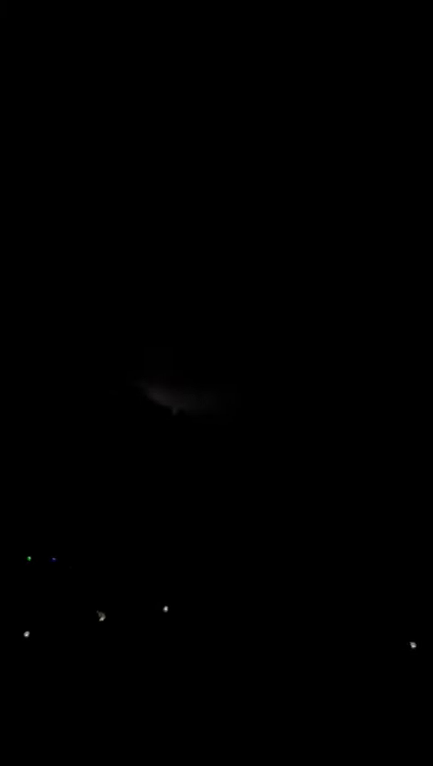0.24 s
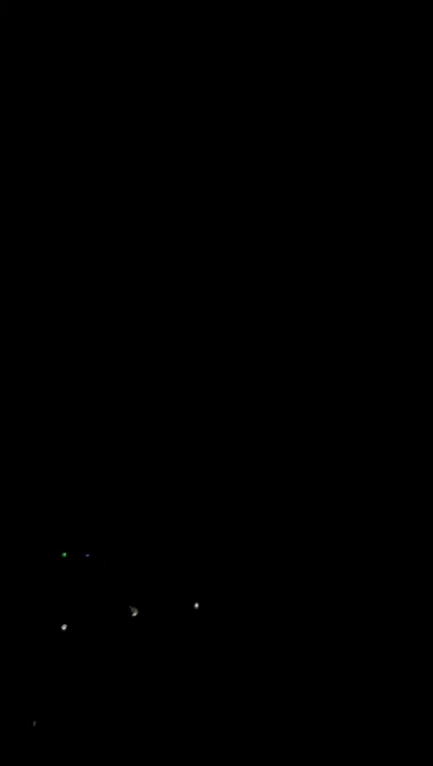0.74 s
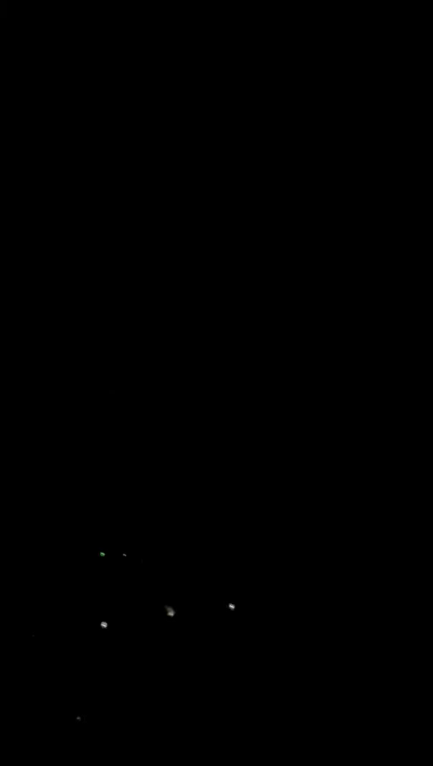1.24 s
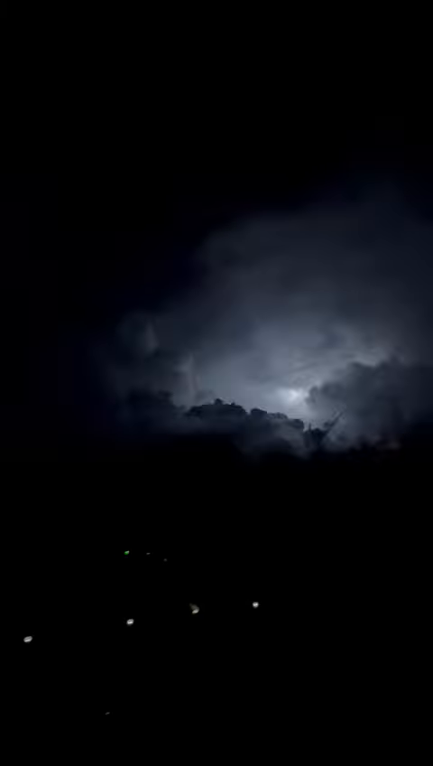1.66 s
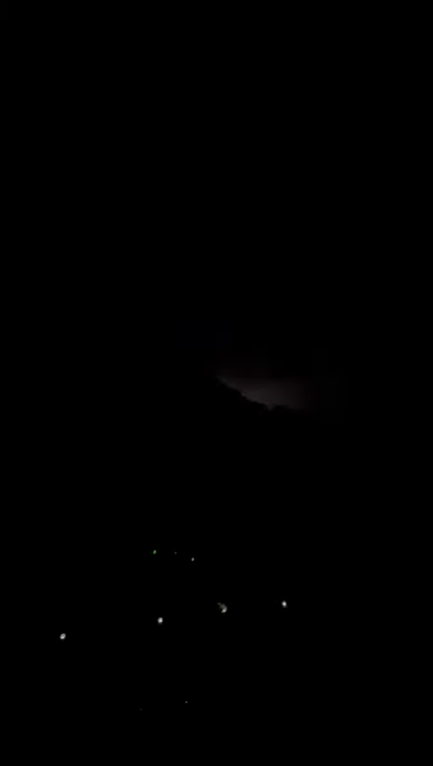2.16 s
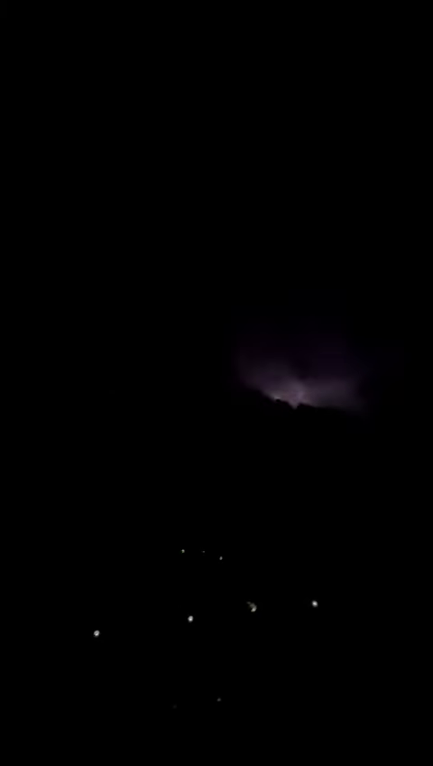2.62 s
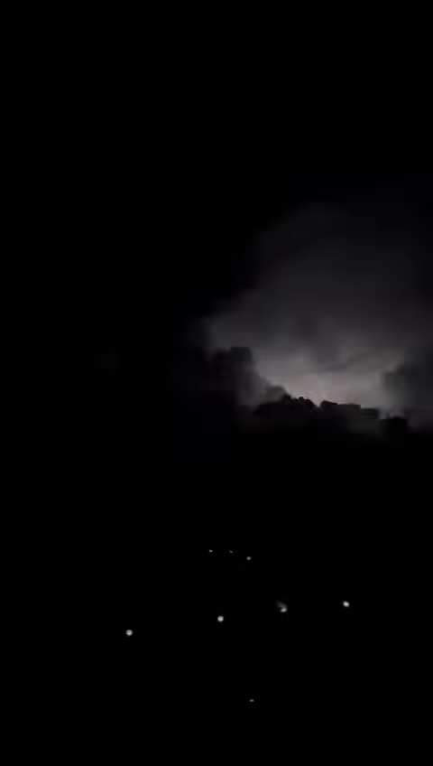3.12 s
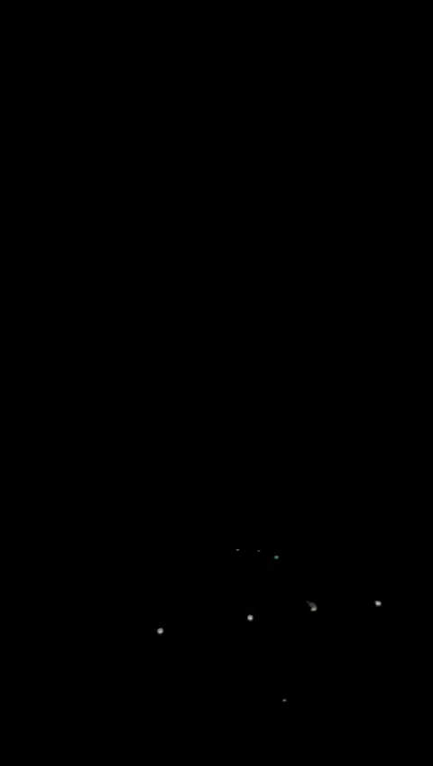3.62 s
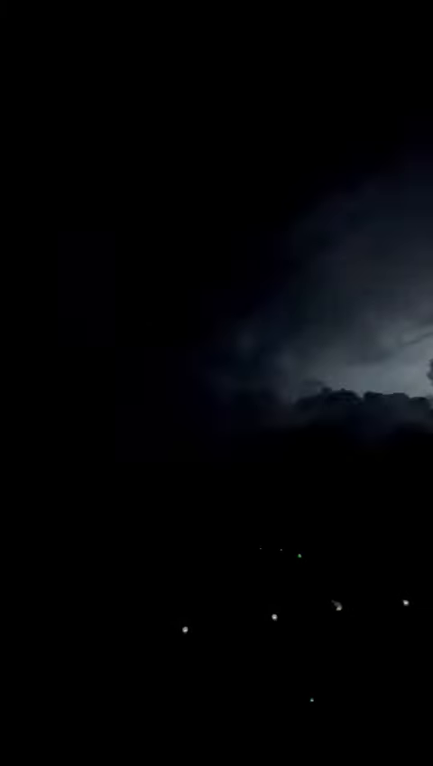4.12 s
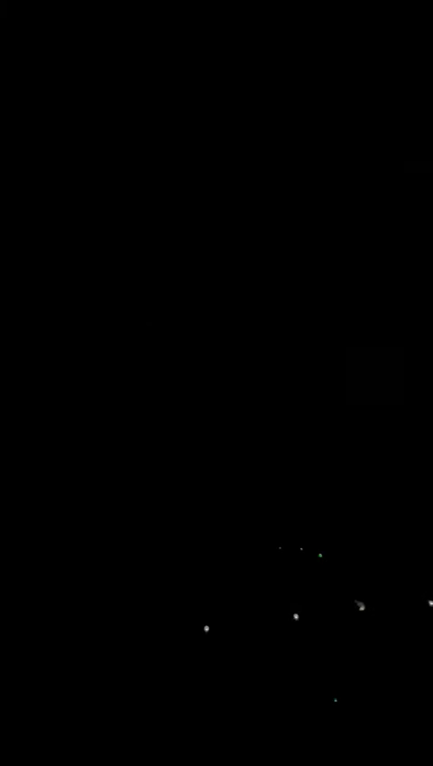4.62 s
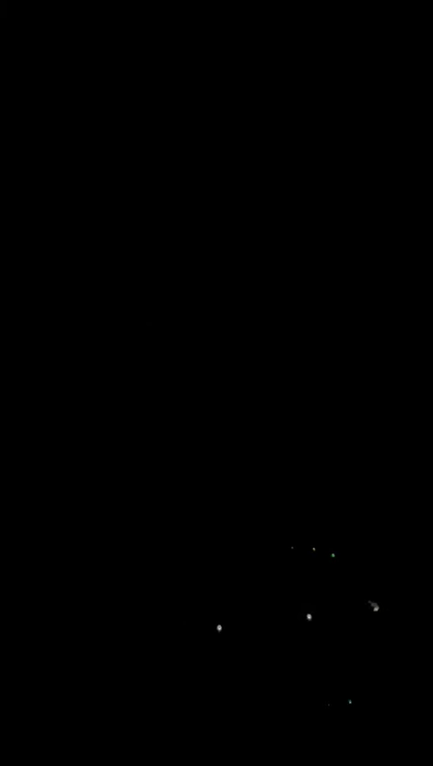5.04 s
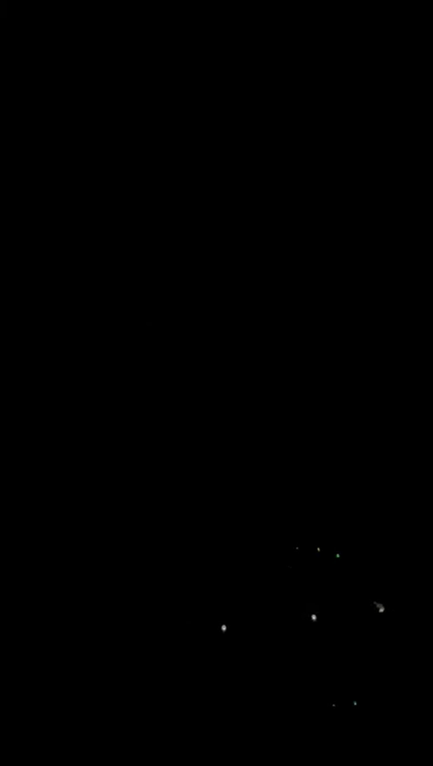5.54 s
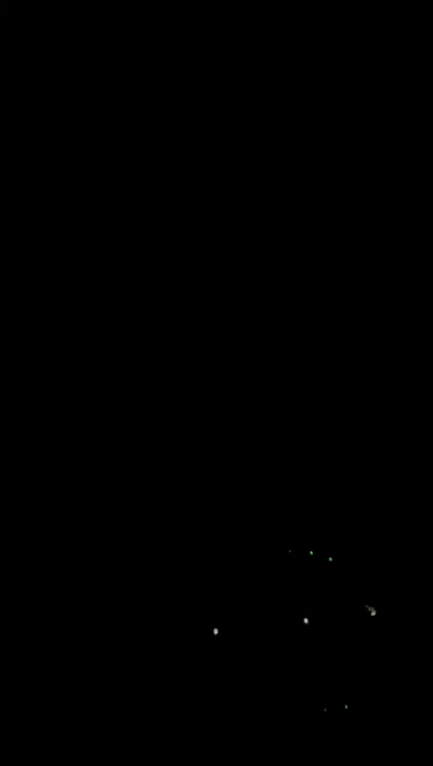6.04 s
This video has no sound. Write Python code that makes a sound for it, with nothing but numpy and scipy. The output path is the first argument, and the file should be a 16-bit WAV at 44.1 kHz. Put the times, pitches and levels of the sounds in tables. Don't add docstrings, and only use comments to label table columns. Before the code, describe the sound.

A quiet, open night with continuous insect trilling in layers, from a low purr near 2.7 kHz to fast shimmer above 6 kHz, swelling and fading. A tiny tick marks the start. From 0 s a near cricket sings roughly half-second phrases of about thirteen falling strokes around 5 kHz, slowing within each phrase; it leans left around 1-2.7 s, then right after 3.4 s. A second cricket buzzes at about sixty strokes per second: gently at 0.65 and 4.2 s, with louder climbing bursts at 1.75-2.1, 2.9-3.45 and 5.4-5.75 s. Thin bat squeaks flicker near 10-12 kHz, clearest at 2.5 and 5.6 s. Deep far thunder swells strongest from 0.9 to 2.3 s, then gives weaker rolls and thumps. Muffled traffic and tyre drone recede, with a short wet swish near 5.8 s, over faint transformer hum. Short outdoor reflections blur the edges.

```python
import sys
import numpy as np
from scipy import signal
from scipy.fft import rfft, irfft, next_fast_len
from scipy.io import wavfile
from scipy.ndimage import uniform_filter1d

SR = 44100
rng = np.random.default_rng(int(sys.argv[2]) if len(sys.argv) > 2 else 0)


def dump(signal):
    limited = np.clip(np.atleast_2d(signal).T, -1, 1)
    pcm = np.round(limited * 32767).astype(np.int16)
    wavfile.write(sys.argv[1], SR, pcm)


def level_to_linear(level):
    exponent = np.asarray(level, float) / 20
    return 10 ** exponent


N = 276534


def rms_one(x):
    return x / np.sqrt(np.mean(x ** 2) + 1e-20)


def in_time(rows):
    s, *columns = np.transpose(rows)
    return [np.interp(np.arange(N) / SR, s, column) for column in columns]


def at_hz(points, hz):
    table_hz, table_db = np.transpose(points)
    return np.interp(np.log(hz), np.log(table_hz), table_db)


def wander(step_s):
    knots = np.arange(0, N / SR + 1, step_s)
    return np.interp(np.arange(N) / SR, knots, rng.standard_normal(len(knots)))


def rasp(depth, size):
    return 1 + depth * rms_one(np.convolve(rng.standard_normal(N), np.hanning(size), "same"))


def swell(u, peak):
    warp = np.log(.5) / np.log(np.clip(peak, .05, .95))
    return np.sin(np.pi * u ** warp) ** 2


def add(track, start_s, pitch_hz, level, overtone_db=-60):
    phase = 2 * np.pi * (np.cumsum(pitch_hz) / SR + rng.random())
    at = round(start_s * SR)
    tone = level * (np.sin(phase) + level_to_linear(overtone_db) * np.sin(2 * phase))
    track[at:at + len(tone)] += tone[:max(N - at, 0)]


def sides(pan_db):
    return level_to_linear(np.array([[pan_db / 2], [-pan_db / 2]]))


def outdoors(x, lag_ms, echo_db, t60, turn=0, alike=0, pan_db=0):
    size = next_fast_len(N + SR // 2)
    t = np.arange(SR // 2) / SR
    tails = rng.standard_normal((3, len(t))) * level_to_linear(-60 * t / t60) * (1 - np.exp(-t / .006))
    tails = level_to_linear(echo_db) * rfft(tails / np.linalg.norm(tails[0]), size)
    hz = np.fft.rfftfreq(size, 1 / SR)
    late = np.exp(-1j * (2 * np.pi * hz * lag_ms / 1000 + turn))
    ports = np.array([late, np.ones_like(late)])
    source = np.atleast_2d(rfft(x, size))
    tail = np.sqrt(alike) * ports * tails[2] + np.sqrt(1 - alike) * tails[:2]
    heard = irfft(source * ports + source.mean(0) * tail, size)
    heard[:, :len(t)] += heard[:, N:N + len(t)]
    return sides(pan_db) * heard[:, :N]


def thunder_db():
    # start_s, swell_s, hold_s, level_db
    rolls = [
        (0.379, 0.092, 0.088, -53),
        (0.658, .04, .01, -51),
        (0.849, 0.36, 0.41, -41),
        (1.75, 0.091, .5, -42.5),
        (2.45, .05, 0.27, -51.5),
        (2.878, .05, .12, -51.5),
        (3.62, .05, .01, -50.5),
        (4.198, 0.05, .05, -51.5),
        (4.848, .05, .3, -55.5),
        (5.45, .1, .4, -55.5),
    ]
    fade_db_per_s, murmur_db, murmur_fade_db_per_s = 70, -51.5, 0.9
    t = np.arange(N) / SR
    layers = [murmur_db - murmur_fade_db_per_s * t]
    for start, rise, hold, level_db in rolls:
        before_db = 11 * np.maximum(1 - (t - start) / rise, 0)
        after_db = fade_db_per_s * np.maximum(t - start - rise - hold, 0)
        layers.append(level_db - before_db - after_db)
    return 20 * np.log10(np.sqrt(np.sum(level_to_linear(layers) ** 2, axis=0)))


def rumble_levels():
    # start_s, distance_m
    road = [(0, 135), (.45, 120), (1.1, 84), (1.9, 112), (2.4, 139), (2.9, 116), (3.4, 148), (4.0, 137),
            (4.6, 200), (5.2, 217), (5.75, 180), (5.95, 280), (6.27, 300)]
    growl_db, growl_follows = -61.5, .35
    traffic_db, tyres_100m_db, air_loss_db_per_m, patchy_db = -69, -80.5, .04, 1.27
    swish_s, swish_length_s, swish_peak_db = 5.83, .025, 8
    town_db, tyre_top_db = -86.5, -6.5
    thunder, (metres,) = thunder_db(), in_time(road)
    near_db = -20 * np.log10(np.maximum(metres, 10) / 100)
    swish_db = swish_peak_db * np.exp(-((np.arange(N) / SR - swish_s) / swish_length_s) ** 2)
    road_db = near_db + patchy_db * wander(.06)
    growl = growl_db + growl_follows * (thunder - thunder.mean()) + 1.5 * wander(.08)
    engines = traffic_db + road_db + 1.9 * wander(.05)
    wheels = traffic_db - 9 + road_db + 0.53 * swish_db + 2.5 * wander(.05)
    tyres = tyres_100m_db + road_db + swish_db - air_loss_db_per_m * (metres - 100) + 2.5 * wander(.05)
    wash = 20 * np.log10(np.hypot(level_to_linear(tyres + tyre_top_db), level_to_linear(town_db)))
    return thunder, growl, engines, wheels, tyres, wash


def rumble():
    # frequency_hz, density_db [dB per Hz]
    thunder_colour = [(24, -25), (40, -5.5), (52, 3), (81, -1.5), (116, -8.5), (167, -19), (266, -25),
                      (327, -33.5)]
    # frequency_hz, density_db [dB per Hz]
    road_colour = [(327, -34), (567, -31.5), (734, -35.5), (1960, -54), (2450, -52), (3180, -84),
                   (5390, -120)]
    # frequency_hz, likeness [0 to 1]
    likeness = [(80, .996), (140, .988), (250, .88), (340, .15), (570, .35), (1000, .25), (1700, .8),
                (2200, .1)]
    edges_hz = [130, 400, 700, 1000, 1500]
    drone_hz, drone_width_hz, drone_peak_db = 75, 7, 7
    road_pan_db, road_lag_s = 1.0, .27 / 1000
    size = next_fast_len(N)
    hz = np.fft.rfftfreq(size, 1 / SR) + 1
    drone_db = drone_peak_db / (1 + ((hz - drone_hz) / drone_width_hz) ** 2)
    colour_db = at_hz([*thunder_colour, *road_colour[1:]], hz) + drone_db
    mid, side = rfft(rng.standard_normal((2, size))) * level_to_linear(colour_db)
    alike = np.clip(at_hz(likeness, hz), 0, 1)
    pair = np.sqrt(1 + alike) * mid + np.sqrt(1 - alike) * side * [[1], [-1]]
    pair[0] *= np.exp(-2j * np.pi * hz * road_lag_s / (1 + (hz / 1200) ** 6 + (330 / hz) ** 4))
    pair[0] *= level_to_linear(road_pan_db / (1 + (hz / 1500) ** 6 + (300 / hz) ** 6))
    below = [0, *[1 / (1 + (hz / edge) ** 8) for edge in edges_hz], 1]
    out = np.zeros((2, N))
    for low, high, level_db in zip(below, below[1:], rumble_levels()):
        band = irfft(pair * np.sqrt(high - low), size)[:, :N]
        out += level_to_linear(level_db) * rms_one(band)
    return out


def tread():
    # start_s, pitch_hz, level_db
    tread_path = [(0, 570, -70.5), (.6, 545, -73), (1.2, 560, -74.5), (1.85, 560, -70), (2.3, 560, -75),
                  (2.85, 559.3, -69), (3.5, 520, -71.5), (4.0, 530.3, -75), (4.3, 540, -75),
                  (4.6, 560, -80.5), (4.93, 610.6, -71.5), (5.15, 669, -80.5), (5.35, 700, -76.5),
                  (5.7, 690, -72), (5.82, 690, -86), (6.27, 690, -91)]
    width_hz = 55
    pitch_hz, level_db = in_time(tread_path)
    lowpass = signal.butter(2, width_hz, fs=SR, output="sos")
    slow = signal.sosfilt(lowpass, rng.standard_normal((4, N)))
    phase = 2 * np.pi * np.cumsum(pitch_hz) / SR
    mid, side = slow[:2] * np.cos(phase) + slow[2:] * np.sin(phase)
    return level_to_linear(level_db + 2.1 * wander(.06)) * rms_one(mid + .7 * side * np.array([[1], [-1]]))


def hum():
    # frequency_hz, level_db [rms]
    harmonics = [
        (296.3, -72.5),
        (592.6, -88),
        (888.9, -88),
    ]
    wavers_db = [2.5, 2.5, 2.5]
    fade_db_per_s = .5
    t = np.arange(N) / SR + .0004 * wander(.15)
    out = np.zeros(N)
    for (hz, level_db), waver_db in zip(harmonics, wavers_db):
        line_db = level_db + 3 + waver_db * wander(.12) - fade_db_per_s * (t - 3)
        out += level_to_linear(line_db) * np.sin(2 * np.pi * hz * t)
    return out


def chorus(pitch_hz, spread_hz, fall_hz, per_s, lag_ms, echo_db, level_db, patchy_db, count=8):
    t = np.arange(round(.8 * SR / per_s)) / SR
    out, shape = np.zeros(2 * N), swell(t / t[-1], .4)
    for pitch, pace in zip(np.linspace(-1.5, 1.5, count), rng.normal(0, 1, count)):
        jitter, phase = rng.random((2, 1000, 1))
        gaps = 1 + .03 * pace + .12 * (jitter - .5)
        at = ((np.cumsum(gaps) - .9 * phase[0, 0]) * SR / per_s).astype(int)[:, None]
        heard = at[:, 0] < N
        hz = pitch_hz + spread_hz * pitch + fall_hz * (.4 - t / t[-1] / 2)
        size = level_to_linear(patchy_db * wander(.07)[at[heard]])
        strokes = size * shape * np.sin(2 * np.pi * (hz * t + phase[heard]))
        out += np.bincount((at[heard] + np.arange(len(t))).ravel(), strokes.ravel(), 2 * N)
    return level_to_linear(level_db) * rms_one(outdoors(out[:N], lag_ms, echo_db, t60=.4))


def far_choruses():
    # pitch_hz, spread_hz, fall_hz [in a stroke], strokes_per_s, left_lag_ms, echo_db, level_db,
    # patchiness_db
    trills = [
        (2666, 40, 90, 65, .205, -1.5, -72.3, 1.5),
        (3715, 70, 150, 62, .3, -0.5, -88, 2.5),
        (4680, 280, 500, 40, .286, -1.5, -82.5, 3),
        (7612, 310, 300, 110, 0, -14.5, -88.5, 5.5),
        (6420, 120, 220, 135, .225, 1.5, -79, 4.5),
        (6637, 100, 250, 135, .225, 1.5, -78.5, 3),
    ]
    pans_db = [-1, -1.8, 0, 0, 1.9, 1.9]
    # start_s, then three of level_db over the chorus's own
    joining = [(0, 1, -0.5, -7), (.3, 0.5, -5.5, -9), (.9, 0.5, -2, -8), (1.15, -0.5, 2, -3),
               (1.7, 0.5, -1.5, -5), (1.82, 0, -15, -15), (2.4, 1, -4, -9), (2.8, 0.5, 1.5, -2),
               (3.0, -2, -0.5, 0), (3.6, -2.5, -3, 3.5), (4.2, -3.5, -2, 5.5), (4.8, 0, 0.5, 3),
               (5.3, -1.5, -2, -1), (5.7, -2, -3, -6), (5.95, -1, 4, -3), (6.27, -1, 3.5, 4)]
    voices = [sides(pan_db) * chorus(*row) for row, pan_db in zip(trills, pans_db)]
    changing = [level_to_linear(level_db) * voice for level_db, voice in zip(in_time(joining), voices[3:])]
    return sum(voices[:3]) + sum(changing)


def high_hiss():
    bandpass = signal.butter(2, [10200, 11900], "band", fs=SR, output="sos")
    noise = signal.sosfilt(bandpass, rng.standard_normal(N))
    noise = outdoors(noise, lag_ms=0, echo_db=-8.5, t60=0.22, turn=1.45, alike=.6)
    return level_to_linear(-87 + 3.0 * wander(.05)) * noise


def near_cricket():
    # first_stroke_s, last_stroke_s, strokes, level_db, pan_db [left over right]
    phrases = [(0.021, .457, 13, -66.5, 0), (0.635, .812, 6, -67.5, 0), (.893, 1.344, 13, -65.5, 3),
               (1.548, 1.995, 13, -66, 3), (2.227, 2.671, 13, -66.5, 3), (2.852, 3.3, 13, -65.5, 0),
               (3.401, 3.907, 14, -64.5, -3.5), (4.079, 4.573, 14, -63, -5), (4.808, 5.256, 13, -63, -5),
               (5.436, 5.926, 14, -63, -5), (6.115, 6.564, 13, -63, -4)]
    # level_db [left, right]
    wall_db = [-7, -14]
    wall_delay_s = .017
    out, u = np.zeros(N), np.linspace(0, 1, round(.013 * SR))
    for first, last, strokes, level_db, _ in phrases:
        k = np.arange(round(strokes))
        gaps = 31 + 11.5 / (1 + np.exp((4.3 - k[:-1]) / 1.2))
        centres = first + (last - first) * np.append(0, np.cumsum(gaps)) / gaps.sum()
        grows = 1 - np.exp(-(k + 1) / 1.15)
        for centre, grow, (pitch, size) in zip(centres, grows, rng.normal(0, 1, (len(k), 2))):
            path = (5390 - 960 * u ** 1.3) * (1 + .006 * pitch)
            level = grow * level_to_linear(level_db + 11.3 + 1.1 * size) * swell(u, 0.47) ** .9
            add(out, centre - .0055, path, level, overtone_db=-43.5)
    out = out * rasp(0.3, size=240)
    pan_db = np.interp(np.arange(N) / SR, [row[0] + .2 for row in phrases], [row[4] for row in phrases])
    wall = level_to_linear(np.array(wall_db))[:, None] * np.roll(out, round(wall_delay_s * SR))
    direct = out * level_to_linear([pan_db / 2, -pan_db / 2])
    return outdoors(direct + wall, lag_ms=0.285, echo_db=-1.5, t60=0.41, alike=.25)


def bats():
    # start_s, length_s, lowest_hz, level_db
    dips = [
        (.455, 0.05, 10740, -76),
        (.73, .055, 9300, -74.5),
        (1.276, 0.07, 10500, -79.5),
        (1.965, .04, 11000, -74.5),
        (2.385, .035, 11600, -72.5),
        (2.51, 0.04, 11200, -60),
        (4.02, 0.02, 11700, -86),
    ]
    # start_s, length_s, first_hz, last_hz, level_db
    glides = [(1.45, 0.042, 10260, 11100, -86), (1.875, .015, 11900, 11000, -82),
              (2.06, .03, 10500, 11400, -80), (2.082, .04, 10300, 8500, -83), (2.44, .03, 9300, 10300, -86),
              (2.719, 0.038, 9940, 9800, -83), (2.79, .04, 10000, 10900, -86),
              (2.98, .06, 10600, 11900, -84), (3.199, .05, 11200, 9200, -82),
              (4.273, 0.033, 11800, 9200, -73.5), (4.31, 0.053, 11000, 11250, -82),
              (4.979, 0.068, 10600, 12200, -76), (5.15, .03, 11800, 9500, -83.5),
              (5.2, .05, 10300, 11600, -83), (5.59, 0.082, 10100, 11900, -67.5),
              (5.74, 0.032, 10000, 11400, -74.5), (5.811, .02, 11000, 11700, -80),
              (5.999, .025, 10000, 10600, -85), (6.169, .06, 10700, 11500, -92),
              (2.54, .025, 11600, 12300, -78), (2.475, .04, 11900, 11900, -78), (2.4, .07, 8700, 9000, -93),
              (2.45, .04, 10600, 11100, -86), (2.3, .06, 9800, 10900, -88),
              (3.595, .025, 11900, 11950, -83.5), (3.54, .04, 9800, 11300, -90),
              (3.803, 0.043, 10600, 12100, -89), (4.03, .07, 10750, 10700, -83),
              (4.3, .05, 9400, 9100, -87), (3.73, .06, 9000, 9100, -94), (4.02, .06, 9200, 9600, -95),
              (4.148, 0.029, 10800, 11900, -89), (4.63, .03, 10000, 11500, -91),
              (4.7, .03, 11500, 10000, -89), (4.78, .04, 11600, 11430, -88), (4.99, .05, 11300, 11400, -80),
              (5.764, .025, 11300, 9800, -79), (5.78, .04, 8700, 9000, -87.5),
              (5.33, .1, 10400, 11700, -89), (5.93, .02, 11500, 10700, -87)]
    top_hz = 11830
    out = np.zeros(N)
    near = [(s, length, top_hz, low, top_hz, db) for s, length, low, db in dips]
    near += [(s, length, first, (first + last) / 2, last, db) for s, length, first, last, db in glides]
    ranges, lowest = [6.2, 0.035, 3000, 2600, 3000, 11], [0, .012, 8900.5, 9300.5, 8900.5, -103]
    far = rng.random((120, 6)) * ranges + lowest
    for start, length, first_hz, middle_hz, last_hz, level_db in [*near, *far]:
        u = np.linspace(0, 1, round(length * SR))
        bend = np.interp(u, [0, .5, 1], [first_hz, middle_hz, last_hz])
        path = uniform_filter1d(bend, size=250, mode="nearest")
        add(out, start, path, level_to_linear(level_db + 6.5) * swell(u, .5) ** 0.74)
    out = out * rasp(.35, size=120)
    return outdoors(out, lag_ms=0, echo_db=-12.5, t60=.2, turn=1.45, alike=.8, pan_db=-.6)


def buzzing_cricket():
    # first_stroke_s, end_s, top_start_hz, top_full_effort_hz, level_db
    buzzes = [
        (.642, .875, 5150, 5180, -65.5),
        (1.3, 1.46, 4900, 5000, -78),
        (1.749, 1.88, 5160, 5200, -61.5),
        (1.8521, 2.095, 5250, 5780, -56.5),
        (2.887, 3.1, 5110, 5200, -62),
        (3.2162, 3.45, 5260, 5790, -58),
        (4.2, 4.43, 5020, 5164, -66.5),
        (5.4007, 5.56, 5190, 5204, -62.5),
        (5.5361, 5.757, 5180, 5757, -58),
    ]
    strokes_per_s = 59.3
    out, u = np.zeros(N), np.linspace(0, 1, round(.014 * SR))
    octave, tap = np.zeros(N), np.linspace(0, 1, round(.0065 * SR))
    for first, end, start_hz, full_hz, level_db in buzzes:
        gentle_hz = 5750 - full_hz
        for centre in np.arange(first, end, 1 / strokes_per_s):
            effort = np.clip((centre - first - .02) / .09, 0, 1)
            top = (start_hz + (full_hz - start_hz) * effort ** 3.0) * (1 + .006 * rng.normal())
            level = level_to_linear(level_db + 11.0 - 10.2 * (1 - effort) + 1.2 * rng.normal())
            path = top + 10 - (top - 4230 - 0.65 * gentle_hz) * u ** 1.2
            octave_db = -31 - 0.8 * effort - 0.027 * gentle_hz + 3 * rng.normal()
            knock_db = -19 + 3.5 * effort - .008 * gentle_hz
            add(out, centre - .006 + .0008 * rng.normal(), path, level * swell(u, 0.42))
            add(octave, centre - .006, 2 * path, level * level_to_linear(octave_db) * swell(u, 0.45))
            add(out, centre + .002, 4450 - 550 * tap, level * level_to_linear(knock_db) * swell(tap, 0.45))
    out, octave = out * rasp(.15, size=260), octave * rasp(.4, size=60)
    body = outdoors(out, lag_ms=0.268, echo_db=-2.2, t60=.26, alike=.35, pan_db=1.1)
    return body + outdoors(octave, lag_ms=0, echo_db=-6, t60=.15, turn=1.4, alike=.6, pan_db=-1.1)


def scene():
    ground = rumble() + tread() + hum()
    return ground + far_choruses() + high_hiss() + near_cricket() + bats() + buzzing_cricket()


def thin_out(x):
    # frequency_hz, density_db [dB per Hz]
    kept_above = [(850, -109), (1500, -119), (2200, -123), (4200, -122), (6200, -117), (7600, -124),
                  (8900, -131), (11700, -134), (12400, -120)]
    # frequency_hz, depth_db [under the top of the cricket band]
    gated_under = [(5800, 60), (6100, 14.5), (6900, 15.5), (7600, 26), (8400, 27), (8800, 60)]
    # frequency_hz, level_db [against the band]
    dead_zone = [(150, -22), (500, -9), (1200, -3.5), (2000, -3), (2800, -5), (4000, -3), (4600, -10.5),
                 (5400, -13.5), (6300, -3.5), (8000, -2)]
    frame, offset, lines_kept = 1024, 390, 584
    frame_spread_db, band_spread_db = 1.5, 3.5
    n, k = np.arange(2 * frame)[:, None] + .5, np.arange(lines_kept) + .5
    window = np.sqrt(2 / frame) * np.sin(np.pi * n / 2 / frame)
    basis = window * np.cos(np.pi / frame * (n + frame / 2) * k)
    before, frames, hz = 2 * frame - offset, N // frame + 4, k * SR / 2 / frame
    mid_side = np.array([x[0] + x[1], x[0] - x[1]]) / 2
    pair = np.pad(mid_side, ((0, 0), (before, frames * frame - before - N)))
    halves = pair.reshape(2, frames, frame)
    cells = np.concatenate([halves[:, :-1], halves[:, 1:]], axis=2) @ basis
    power = 2 * cells ** 2 / SR + 1e-20
    band_db = 10 * np.log10(uniform_filter1d(power, size=8, axis=2) + 1e-20)
    cricket_power = power[:, :, (hz > 5350) & (hz < 5900)].sum(0).mean(1)
    loud_db = 10 * np.log10(uniform_filter1d(cricket_power, size=3))
    starved_db = frame_spread_db * rng.standard_normal((frames - 1, 1))
    patches = uniform_filter1d(rng.standard_normal((frames - 1, lines_kept // 8)), size=3, axis=0)
    patches_db = band_spread_db * np.repeat(rms_one(patches), 8, axis=1)
    threshold_db = np.maximum(at_hz(kept_above, hz), loud_db[:, None] - at_hz(gated_under, hz))
    limit_db = threshold_db + starved_db + patches_db
    weak_db = band_db + at_hz(dead_zone, hz) + starved_db - 10 * np.log10(power)
    short_db = np.maximum(limit_db - band_db, weak_db)
    back = cells / (1 + level_to_linear(np.clip(20 * short_db, -99, 60))) @ basis.T
    joined = (back[:, 1:, :frame] + back[:, :-1, frame:]).reshape(2, -1)
    mid, side = joined[:, before - frame:before - frame + N]
    return np.array([mid + side, mid - side])


def band_limit(x):
    return signal.sosfilt(signal.butter(12, 12680, fs=SR, output="sos"), x)


def record(dry):
    tick_db, tick_decay_s = -53, 0.00014
    tick = level_to_linear(tick_db) * np.exp(-np.arange(N) / SR / tick_decay_s)
    return band_limit(thin_out(dry) + tick)


dry = scene()
out = record(dry)
dump(out)
```